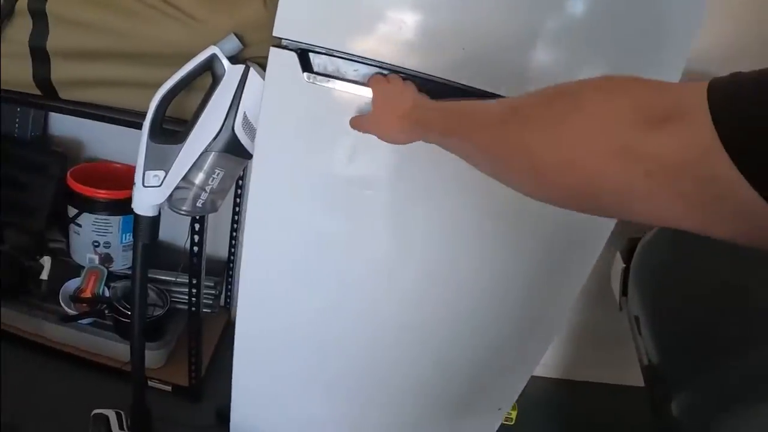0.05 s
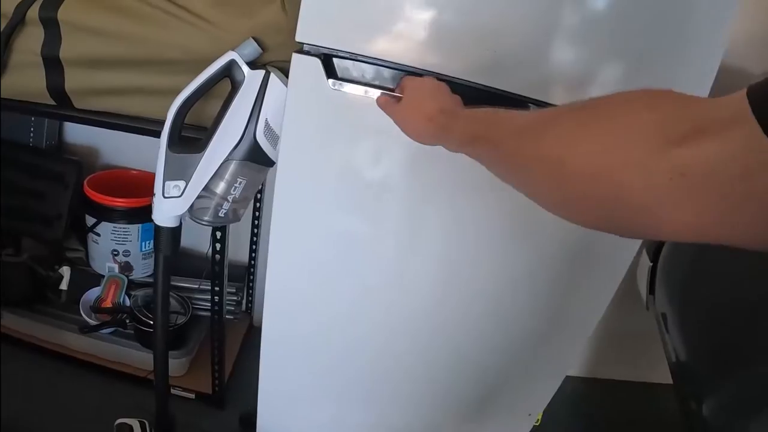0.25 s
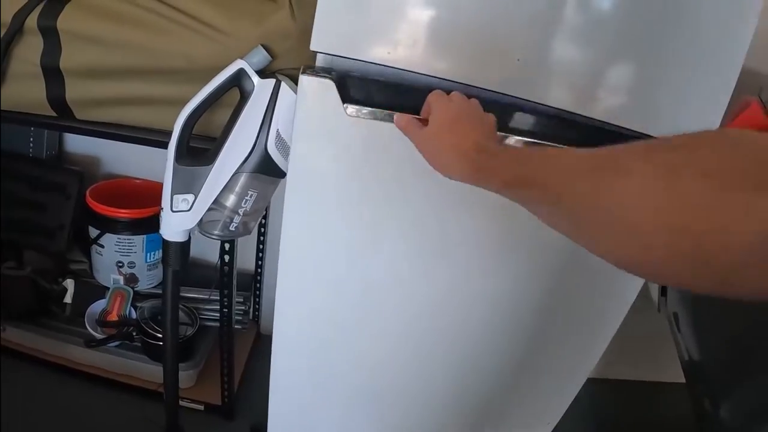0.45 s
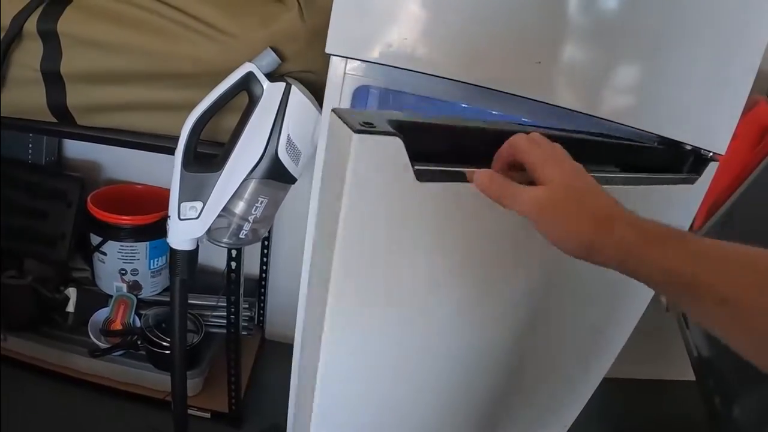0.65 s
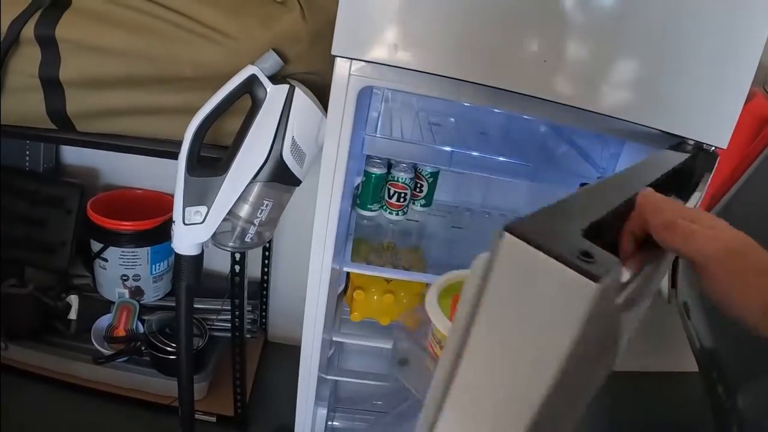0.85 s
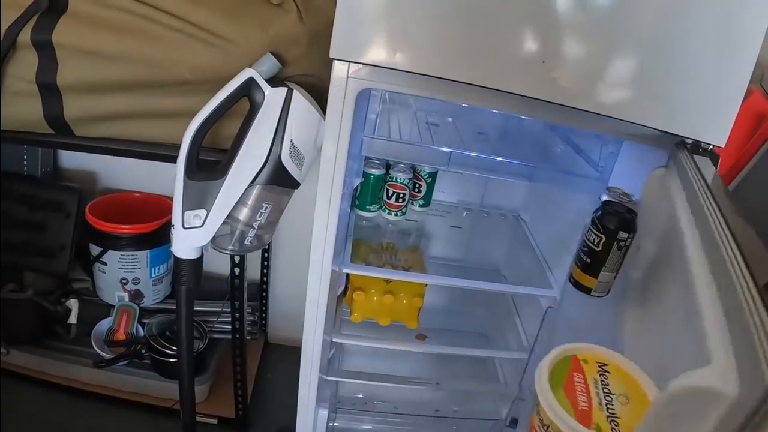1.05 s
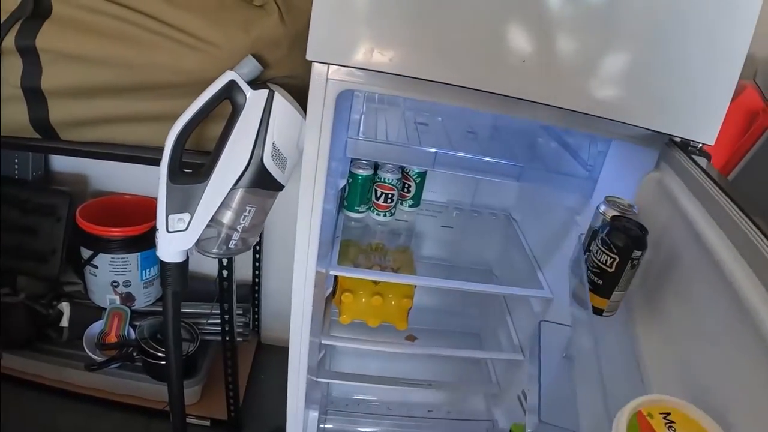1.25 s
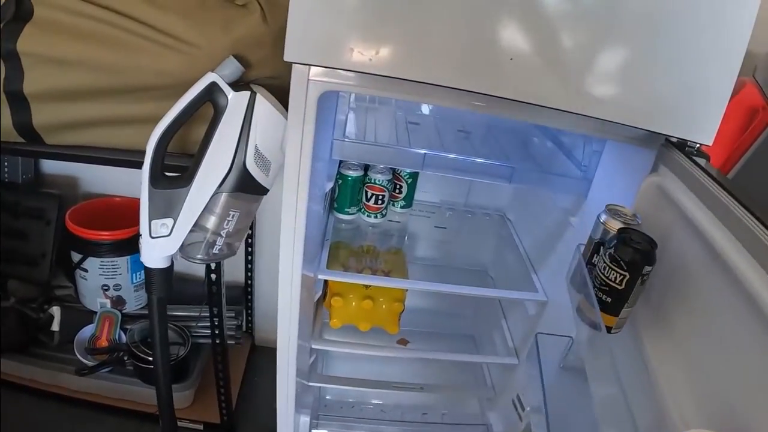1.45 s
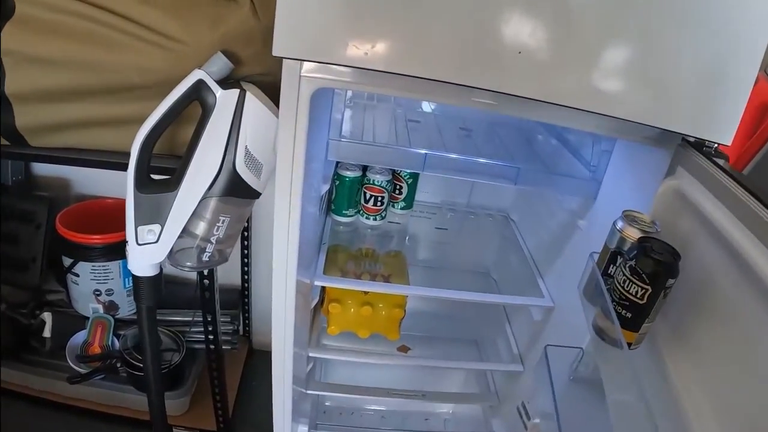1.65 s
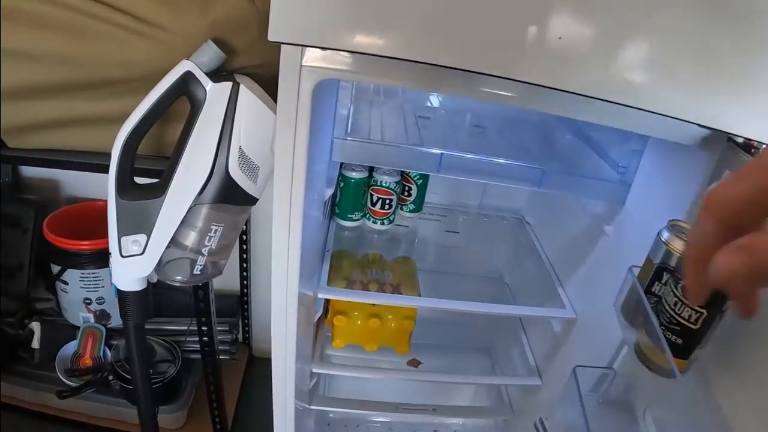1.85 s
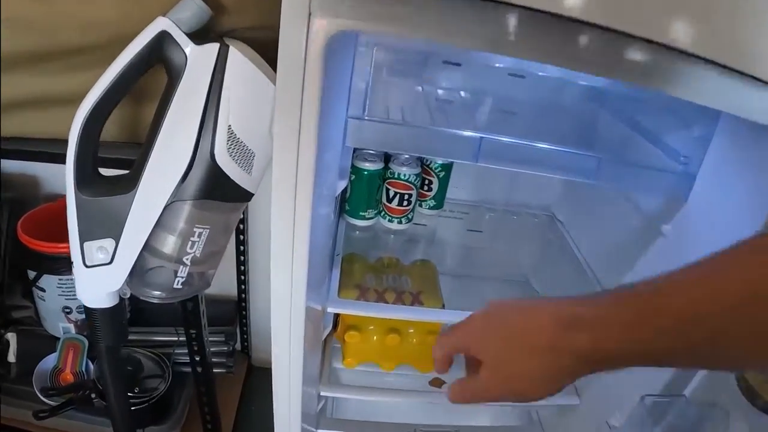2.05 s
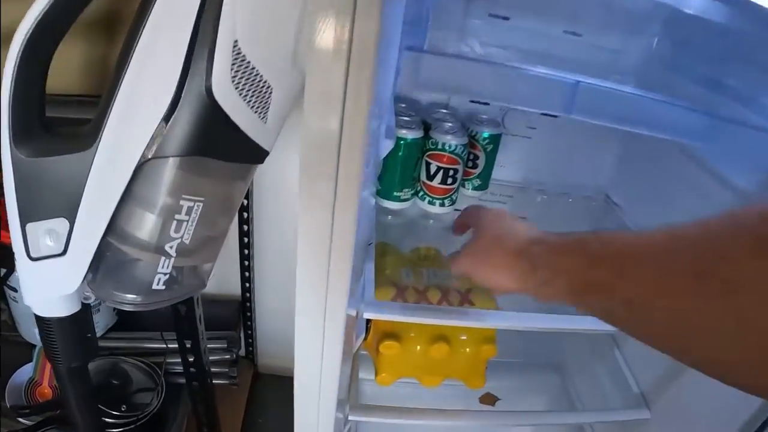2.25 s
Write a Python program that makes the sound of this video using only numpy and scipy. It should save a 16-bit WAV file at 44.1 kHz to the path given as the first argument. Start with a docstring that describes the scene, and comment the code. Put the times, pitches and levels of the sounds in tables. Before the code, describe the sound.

A refrigerator door is pulled open close to the microphone in a garage. The plastic handle clicks, the rubber seal peels off with a thin squeak, then the door thuds and its shelves rattle lightly over steady room noise.

```python
"""A refrigerator door pulled open in a garage, one microphone close by, over steady room noise.
The plastic handle clicks, then the rubber seal peels off with a thin falling squeak and a puff of air.
From half a second in, the freed door shudders and booms, knocking its loaded shelves.
Small rattles follow as it swings wide, and two faint low hums pass while it stands open."""
import sys
import numpy as np
from scipy import signal
from scipy.fft import rfft, irfft
from scipy.io import wavfile
from scipy.ndimage import uniform_filter1d

SR = 44100
rng = np.random.default_rng(int(sys.argv[2]) if len(sys.argv) > 2 else 0)


def store_pcm(level_fs):
    """Save levels as 16-bit WAV."""
    pcm = np.round(np.clip(level_fs, -1, 1) * 32767).astype(np.int16)
    wavfile.write(sys.argv[1], SR, np.atleast_2d(pcm).T)


N = 105840
T = np.arange(N) / SR
HZ = np.fft.rfftfreq(4096, 1 / SR)


def amp(db):
    """Decibels to gain."""
    return 10 ** (np.asarray(db) / 20)


def unit(x):
    """Scales to an rms of one."""
    return x / np.sqrt(np.mean(x ** 2) + 1e-20)


def read(points, hz):
    """Reads a curve on a log-frequency axis."""
    point_hz, value = np.transpose(points)
    return np.interp(np.log(hz + 1), np.log(point_hz + 1), value)


def level(points):
    """Gain over time from rows that start with a time and end with a level."""
    rows = np.array(points)
    return amp(np.interp(T, rows[:, 0], rows[:, -1], left=-100, right=-100))


def add(mix, start_s, sound):
    """Mixes a sound in at a time."""
    part = mix[max(round(start_s * SR), 0):][:len(sound)]
    part += sound[:len(part)]


def colour(x, db):
    """Minimum-phase filter with the given gains along HZ."""
    log_gain = np.log(amp(np.maximum(db, -100)))
    mirrored = np.concatenate([log_gain, log_gain[-2:0:-1]])
    response = np.exp(np.conj(signal.hilbert(mirrored)))[:len(HZ)]
    return signal.fftconvolve(x, irfft(response))[:len(x)]


def noise(db):
    """Noise of unit rms with the given spectral shape along HZ."""
    return unit(colour(rng.standard_normal(N), db))


def hump(centre_hz, octaves):
    """A spectral hump with straight skirts, in dB."""
    return -12 * (np.hypot(1, np.log2((HZ + 20) / centre_hz) / octaves) - 1)


def waver(samples):
    """Random motion, smoothed over so many samples."""
    return unit(uniform_filter1d(uniform_filter1d(rng.standard_normal(N), samples), samples))


def arch(start_s, length_s):
    """A swell that rises a little faster than it falls."""
    return np.sin(np.pi * np.clip((T - start_s) / length_s, 0, 1) ** .7)


def puff(start_s, length_s, db, centre_hz, octaves):
    """A short swell of noise."""
    return amp(db) * arch(start_s, length_s) * noise(hump(centre_hz, octaves))


def garage(x):
    """Scattered reflections off the garage walls, each band dying at its own speed."""
    # reverberation: frequency_hz, t60_s
    decay_times = [(80, 0.68), (300, 0.27), (1000, 0.26), (4000, 0.16), (12000, 0.35)]
    echoes = rng.standard_normal(SR) * (rng.random(SR) < .08) * (T[:SR] > .005)
    hz, t, bands = signal.stft(echoes, SR, nperseg=256)
    fade = amp(-60 * t / read(decay_times, hz)[:, None])
    tail = signal.istft(bands * fade, SR, nperseg=256)[1]
    return signal.fftconvolve(x, tail / np.linalg.norm(tail))[:N]


def room_tone():
    """The steady noise of the garage, with two faint hums while the door stands open."""
    # room noise spectrum: frequency_hz, relative_db
    air = [(20, -52), (100, -71), (135, -14), (185, -2), (240, -10.5), (500, -3.5), (850, -8.5), (1400, -8),
           (3000, -11), (5000, -15), (7000, -20.5), (13000, -27.5)]
    # low hums: start_s, length_s, level_db, centre_hz, spread_octaves
    hums = [(1.83, 0.21, -44, 198.8, 0.15), (2.30, 0.17, -47.5, 320, 0.24)]
    return amp(-42) * noise(read(air, HZ)) + sum(puff(*hum) for hum in hums)


def draught():
    """Air is drawn in through the opening gap in one soft low puff."""
    return puff(start_s=.335, length_s=.15, db=-32.5, centre_hz=79, octaves=1)


def cabinet_rumble():
    """The cabinet rumbles under the strain of being pulled and handled."""
    # rumble envelope: time_s, level_db
    strain = [(0.06, -42.5), (0.095, -33.5), (0.17, -36.5), (0.22, -21), (0.35, -23), (0.42, -23.5),
              (0.50, -24.5), (0.60, -13), (0.72, -31), (0.84, -24.5), (1.0, -34.5), (1.15, -42.5),
              (1.6, -52.5), (1.75, -49), (2.4, -45)]
    # rumble spectrum: frequency_hz, relative_db
    spectrum = [(25, 8.5), (60, -32.5), (110, -15), (165, 0), (230, -1.5), (340, 3), (470, -8.5),
                (700, -5.5), (1500, -42), (4000, -69)]
    return level(strain) * noise(read(spectrum, HZ))


def seal_peel():
    """The rubber unsticks in a crowd of tiny snaps and a few hisses."""
    # the seal peeling, then the door swinging: time_s, level_db
    envelope = [(0.05, -44), (0.09, -41.5), (0.19, -33), (0.21, -28), (0.27, -21), (0.32, -26.5),
                (0.40, -26), (0.435, -22.5), (0.49, -27.5), (0.60, -25.5), (0.68, -30.5), (0.82, -32),
                (0.92, -35), (1.12, -35), (1.25, -47.5), (1.4, -52)]
    # peel spectrum: frequency_hz, relative_db
    spectrum = [(60, -56.5), (300, 3.5), (600, -9), (1100, -0.5), (1400, -3), (1900, -2), (2700, -4.5),
                (4200, -8), (6500, -18), (13000, -25.5)]
    # rubber letting go and brushing past: start_s, length_s, level_db, centre_hz, spread_octaves
    hisses = [(0.25, .045, -30, 3200, 1.1), (0.412, .065, -30, 5270, 1.1), (0.50, .04, -29, 3700, .6),
              (0.55, .085, -33.5, 9000, 1.2), (0.70, .035, -43, 5000, 1.3), (0.88, .2, -49, 9000, 1.2),
              (1.02, .17, -46, 11800, .4)]
    snaps_per_s, spread_db, hiss_gain = 2700, 3.5, .67
    sizes = amp(spread_db * np.minimum(rng.exponential(1, N), 4))
    snaps = sizes * rng.choice([-1, 1], N) * (rng.random(N) < snaps_per_s / SR)
    crackle = unit(snaps) + hiss_gain * rng.standard_normal(N)
    peel = unit(colour(crackle, read(spectrum, HZ)))
    return level(envelope) * peel + sum(puff(*hiss) for hiss in hisses)


def seal_squeak():
    """The seal sticks and slips, ever more slowly as the tension eases, and chirps where it catches."""
    # stick-slip glide: time_s, pitch_hz, level_db
    glide = [(0.262, 440, -37), (0.279, 416, -25), (0.319, 392, -19), (0.336, 372, -17.5),
             (0.36, 362, -22.5), (0.40, 356, -36)]
    # harmonics, from the first up: relative_db
    harmonics = [-4.5, -13, -6, -12, -1, -32]
    # rubbed rubber: start_s, length_s, pitch_hz, level_db
    chirps = [(0.058, 0.043, 1000, -38), (0.385, 0.0081, 1770, -20), (0.4867, 0.0064, 1776, -16.5)]
    jitter, roughness, room_db = .018, .6, -10.5
    time_s, slip_hz, _ = np.transpose(glide)
    unsteady = 1 + jitter * waver(samples=50)
    cycles = np.cumsum(np.interp(T, time_s, slip_hz) * unsteady) / SR
    tone = level(glide) * sum(
        amp(db) * np.sin(2 * np.pi * k * cycles) * (1 + roughness * waver(samples=150))
        for k, db in enumerate(harmonics, 1))
    for start_s, length_s, pitch_hz, db in chirps:
        phase = 2 * np.pi * pitch_hz * np.cumsum(unsteady) / SR
        tone += amp(db) * arch(start_s, length_s) * np.sin(phase)
    return tone + amp(room_db) * garage(tone)


def door_knocks():
    """Cushioned knocks set the hollow door booming."""
    # the door and its load: start_s, level_db, treble_tilt_db_per_octave, rise_s
    knocks = [(0.5101, -7, 5.5, 0.0051), (0.5189, -13.5, -2, 0.013), (0.5472, -13.5, -11, 0.0012),
              (0.5813, 0, -2.5, 0.0079), (0.6395, -5, -2.5, 0.012), (0.6618, -13.5, -2, 0.0033),
              (0.689, -14.5, -5, 0.0009), (0.7482, -10, -1.5, 0.015), (0.7913, -9, -2, 0.0011),
              (0.822, -13.5, -4, 0.002), (0.8746, -18.5, -10, 0.014), (0.9112, -19.5, -3, 0.0072),
              (0.9844, -28, -6, 0.0031), (1.245, -38.5, 4, 0.0068)]
    # modes of the door: pitch_hz, relative_db, t60_s
    modes = [(78, -24, .64), (144, -31, .23), (156, -18, .22), (284, -12, .2), (317, -6.5, .6),
             (331, 1, .15), (346, -3, .14), (422, -16, .36), (495, -14, .19), (572, -12, .2),
             (839, -10, .13), (892, -22, .27), (1035, -8, .09), (1400, -21, .1)]
    tilt_from_hz, room_db = 350, -19
    out, t = np.zeros(N), T[:SR]
    ringing = np.array([amp(db - 60 * t / t60) * np.sin(2 * np.pi * hz * t) for hz, db, t60 in modes])
    octaves_up = np.maximum(np.log2(np.array(modes)[:, 0] / tilt_from_hz), 0)
    for start_s, db, tilt, rise_s in knocks:
        onset = 1 - np.exp(-(t / rise_s) ** 2)
        boom = amp(db + tilt * octaves_up) @ ringing
        add(out, start_s, onset * boom)
    return out + amp(room_db) * garage(out)


def clicks():
    """Each hard contact is a short crack and a duller ring; the plastic liner colours both."""
    # handle, shelves and cans: start_s, level_db, centre_hz, spread_octaves, decay_s
    contacts = [(0.0865, -19.5, 400, 2.1, 0.0082), (0.0945, -10, 1360, 2.4, 0.0026),
                (0.0999, -19, 890, .55, 0.0066), (0.1507, -28.5, 2400, 1.3, 0.015),
                (0.1930, -14, 1130, 1.25, 0.0037), (0.1975, -3.5, 4200, 2.6, 0.00086),
                (0.2006, 2, 1490, 1.02, 0.0021), (0.205, -4, 2530, 0.35, 0.0018),
                (0.251, -13.5, 2500, 0.76, 0.03), (0.2570, -8.5, 714, 1.5, 0.0041),
                (0.3560, -13, 420, 0.54, 0.0038), (0.5060, -15, 880, 1.16, 0.013),
                (0.5150, -18.5, 895, 1.4, 0.024), (0.5785, -15.5, 1670, 1.8, 0.014),
                (0.5835, -9, 740, 0.9, 0.0096), (0.5900, -19.5, 3200, 0.95, 0.018),
                (0.6909, -16, 2530, 0.7, 0.0014), (0.7076, -28.5, 2980, 1.7, 0.024),
                (0.775, -35, 2570, 0.52, .002), (0.7841, -19.5, 2340, 0.55, .014),
                (0.7950, -20, 900, 1.3, 0.02), (0.8060, -33, 4300, 0.89, .003),
                (1.1106, -15.5, 3000, 0.83, 0.0019), (1.207, -31, 1210, 1.14, .016),
                (1.7010, -22, 1750, 0.92, 0.0029), (1.7030, -31.5, 400, 1.1, 0.028),
                (1.8072, -35, 4250, 1.2, 0.015), (2.226, -41, 5000, 0.55, 0.0055),
                (2.2350, -33, 222, 0.6, 0.0072)]
    # resonances of the liner: centre_hz, width_hz, lift_db
    liner = [(243.4, 56, 12), (571, 56, 13.5), (851, 240, 8.5), (1107, 180, 5.5), (1720, 300, 5.5),
             (1950, 160, 2.5), (2550, 160, 5), (3190, 1500, 5.5)]
    ring_db, ring_decay_s, ring_cutoff_hz = -14.5, .019, 4500
    bass_hz, room_db = 144, -8.5
    out, t = np.zeros(N), T[:SR // 4]
    liner_db = sum(db / (1 + (2 * (HZ - hz) / width) ** 2) for hz, width, db in liner)
    liner_db -= 10 * np.log10(1 + (bass_hz / (HZ + 1)) ** 6)  # plastic radiates little bass
    for start_s, db, centre_hz, octaves, decay_s in contacts:
        crack = rng.standard_normal(len(t)) * np.exp(-t / decay_s)
        power = uniform_filter1d(abs(rfft(crack, 2 * len(HZ) - 2)) ** 2, size=40)
        crack = colour(crack, -10 * np.log10(power / power.mean()))  # flattens its spectrum
        ring = rng.standard_normal(len(t)) * np.exp(-t / ring_decay_s)
        ring = colour(ring, ring_db - 10 * np.log10(1 + (HZ / ring_cutoff_hz) ** 2))
        click = colour(crack + ring, hump(centre_hz, octaves) + liner_db)
        add(out, start_s, amp(db) * np.sqrt(decay_s * SR / 2) * click / np.linalg.norm(click))
    return out + amp(room_db) * garage(out)


def scene():
    """Handle, door and seal close up, with the garage behind them, in mono."""
    mix = room_tone() + clicks() + door_knocks() + cabinet_rumble()
    return (mix + seal_peel() + seal_squeak() + draught())[None]


def record(dry):
    """The close microphone colours the sound, clips peaks at full scale and loses the top treble."""
    # microphone response: frequency_hz, gain_db
    response = [(20, -40), (42, -21), (62, 3), (6800, -4), (8200, -13.5), (8900, -18.5), (9200, -25),
                (9600, -15.5), (10600, -10), (12000, -5.5), (12900, -19.5), (13700, -24)]
    heard = np.clip(colour(dry[0], read(response, HZ)), -1, 1)
    band_limit = signal.firwin(255, cutoff=13700, window=("kaiser", 8), fs=SR)
    return signal.fftconvolve(heard, band_limit, "same")[None]


dry = scene()
out = record(dry)
store_pcm(out)
```